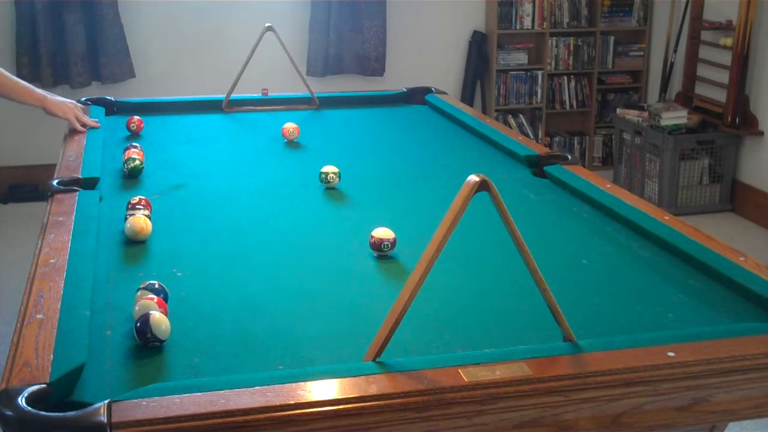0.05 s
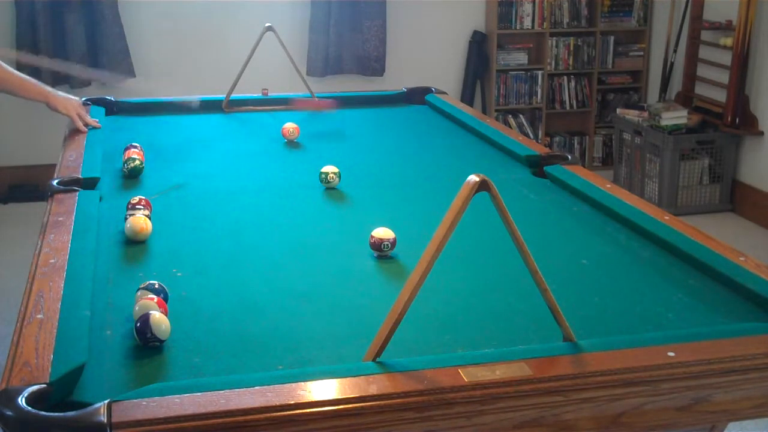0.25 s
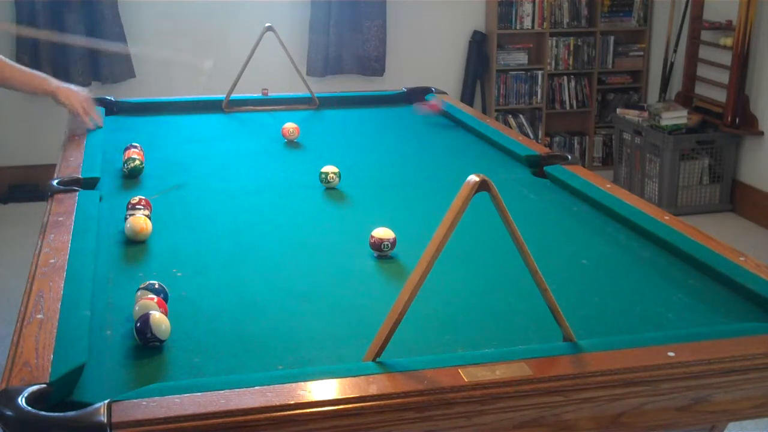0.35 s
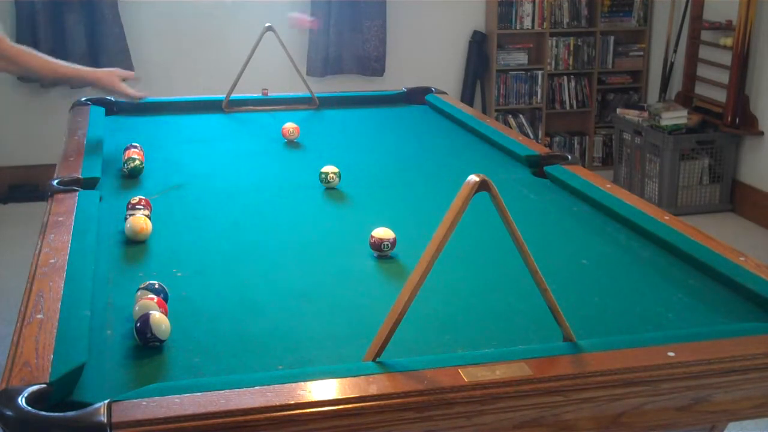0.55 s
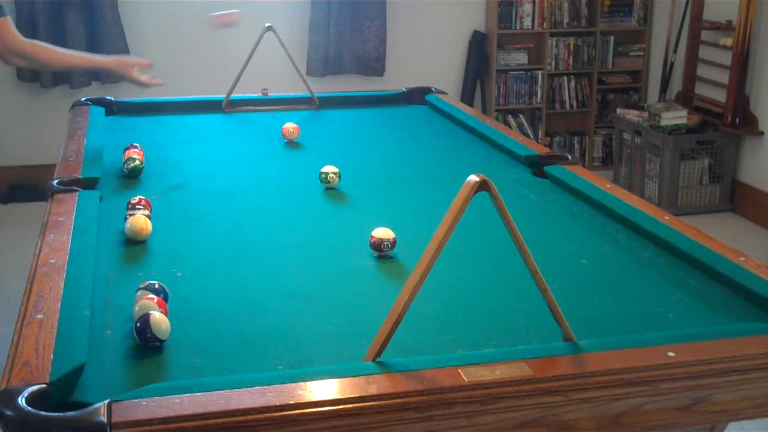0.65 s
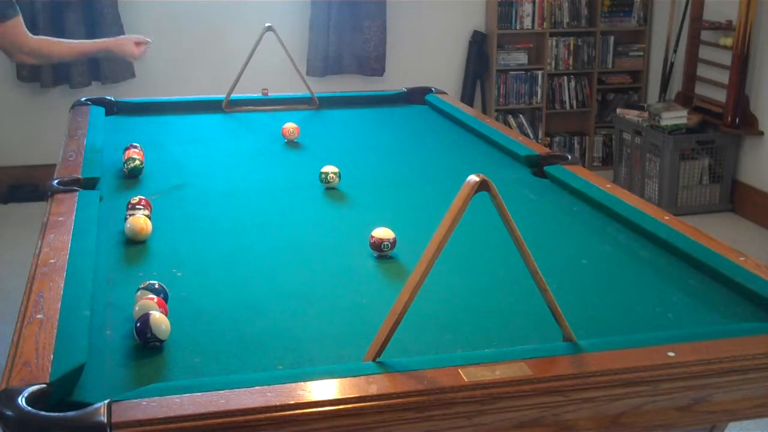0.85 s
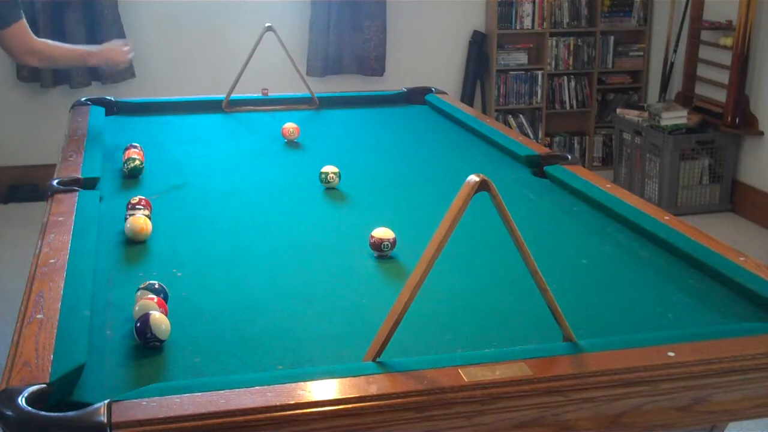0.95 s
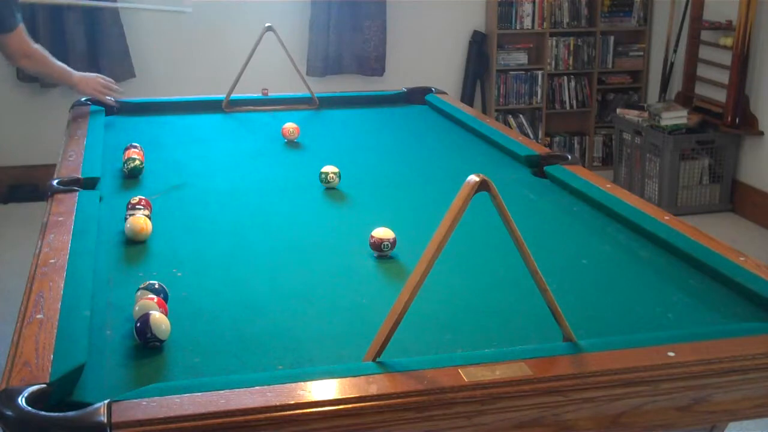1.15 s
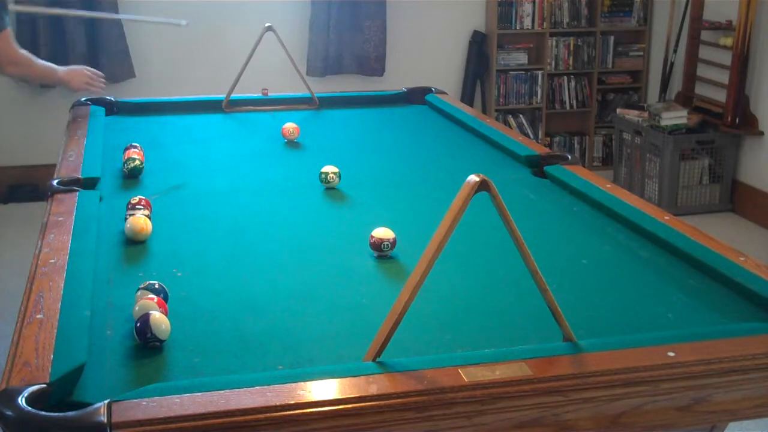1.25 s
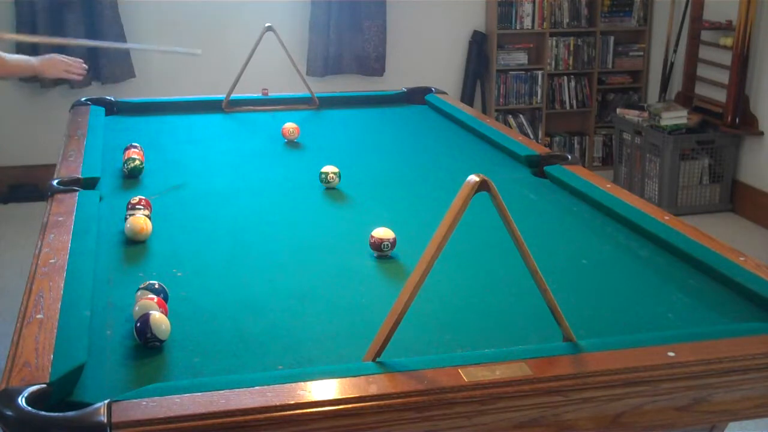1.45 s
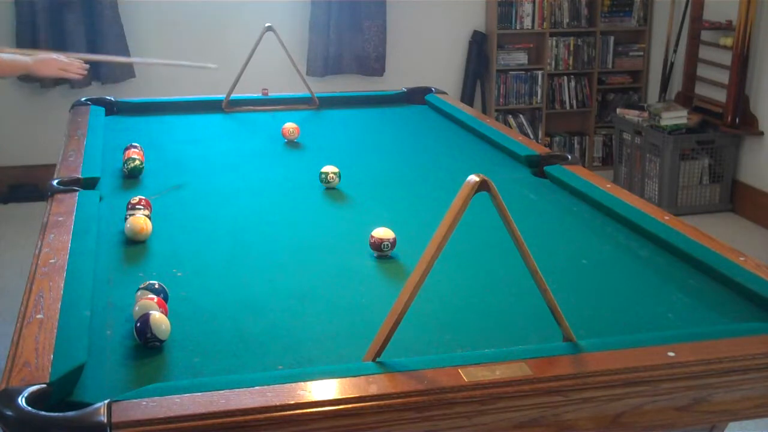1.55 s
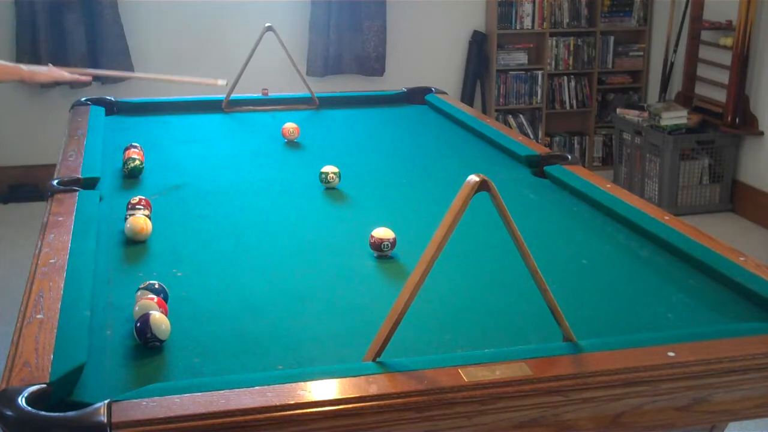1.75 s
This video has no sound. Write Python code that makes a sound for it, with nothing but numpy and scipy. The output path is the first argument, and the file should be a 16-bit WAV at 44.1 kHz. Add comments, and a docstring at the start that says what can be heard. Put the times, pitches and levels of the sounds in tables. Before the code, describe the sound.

A cue cracks a pool ball hard into the table in a small room. The ball thuds off the rail, brushes a curtain, bumps the wall, drops to the floor, clacks against wood and rolls softly.

```python
"""Pool jump shot off the table

In a small room a cue cracks the ball hard into the slate, and the table rings. The ball thuds on the far
rail and flies off, brushes a curtain, bumps the wall, drops to the floor and clatters against wood. Then
it rumbles softly along the floor while something slides. Impacts are coloured pulses with room echo,
struck bodies ring as decaying sines, and friction is swelling, grainy noise."""
import sys
import numpy as np
from scipy import signal
from scipy.fft import rfft, irfft, next_fast_len
from scipy.io import wavfile
from scipy.ndimage import uniform_filter1d

SR = 44100
rng = np.random.default_rng(int(sys.argv[2]) if len(sys.argv) > 2 else 0)


def generate_wav(sig):
    """Save sig (samples, or channels by samples) to the path in sys.argv[1] as 16-bit PCM at SR."""
    pcm = np.round(np.clip(np.atleast_2d(sig).T, -1, 1) * 32767).astype(np.int16)
    wavfile.write(sys.argv[1], SR, pcm)


N = 79380
TIME = np.arange(N) / SR
FFT_SIZE = next_fast_len(2 * N, True)
HZ = np.maximum(np.fft.rfftfreq(FFT_SIZE, 1 / SR), 1)
LEFT_RIGHT = np.array([[1], [-1]])

# the ball driven into the slate (time [s], level [dB])
SLATE_HITS = [(.2092, 2.4)]


def from_db(db):
    """Decibels to gain."""
    return 10 ** (np.asarray(db) / 20)


def at_hz(points, hz):
    """Read a curve on a log-frequency axis."""
    freqs, values = np.transpose(points)
    return np.interp(np.log(hz), np.log(freqs), values)


def decay(t60, t=TIME):
    """Fade by 60 dB in t60 seconds."""
    return np.exp(-np.log(1000) * t / t60)


def filtered(x, gain):
    """Apply a frequency response."""
    return irfft(rfft(x, FFT_SIZE) * gain, FFT_SIZE)[..., :N]


def coloured(x, colour):
    """Minimum-phase EQ along a dB curve, so nothing rings ahead of an attack."""
    cepstrum = irfft(np.log(from_db(at_hz(colour, HZ))), FFT_SIZE)
    cepstrum[1:FFT_SIZE // 2] *= 2
    cepstrum[FFT_SIZE // 2 + 1:] = 0
    return filtered(x, np.exp(rfft(cepstrum)))


def panned(x, balance):
    """Lean each frequency to the left or right."""
    return filtered(x, from_db(LEFT_RIGHT * at_hz(balance, HZ) / 2))


def even_noise():
    """Two white noises, random in detail but even in strength over time and frequency."""
    cells = signal.stft(rng.standard_normal((2, N)), nperseg=1024)[2]
    power = uniform_filter1d(np.abs(cells) ** 2, size=4, axis=1)
    power = uniform_filter1d(power, size=2, axis=2)
    noise = signal.istft(cells / np.sqrt(power + 1e-18))[1][:, :N]
    return noise / noise.std()


def diffuse_noise():
    """Stereo noise, narrow in the low mids and wide in the treble."""
    # stereo width (frequency [Hz], side minus mid [dB])
    width = [(30, 0.5), (100, -14.5), (250, -18.5), (700, -13), (1500, -7.5), (3000, -3), (6000, 2),
             (12000, 0)]
    mid, side = np.roll(even_noise(), N // 2, axis=1)
    return mid + LEFT_RIGHT * filtered(side, from_db(at_hz(width, HZ)))


def room_tail(build_s=0.0041):
    """Reverb that builds quickly and dies at its own rate in each octave."""
    # reverb time of the room (frequency [Hz], t60 [s])
    room_t60 = [(60, 0.94), (170, 0.59), (400, 0.48), (1200, 0.51), (2500, 0.36), (6000, 0.5),
                (12000, 0.22)]
    spectrum, octaves_hz = rfft(diffuse_noise(), FFT_SIZE), np.geomspace(50, 12800, 9)
    tail = 0
    for hz, selector in zip(octaves_hz, np.eye(len(octaves_hz))):
        band = np.interp(np.log(HZ), np.log(octaves_hz), selector)
        tail += irfft(spectrum * band, FFT_SIZE)[:, :N] * decay(at_hz(room_t60, hz))
    return tail * (1 - np.exp(-TIME / build_s))


def pulse_spectrum(hits):
    """One pulse per hit; a soft contact is dull above its cutoff."""
    spectrum = 0
    for s, db, *cutoff in hits:
        lowpass = 1 / (1 + np.sqrt(2) * 1j * HZ / cutoff[0] - (HZ / cutoff[0]) ** 2) if cutoff else 1
        spectrum += from_db(db) * lowpass * np.exp(-2j * np.pi * HZ * round(s * SR) / SR)
    return spectrum


def impacts(hits, colour, direct_db, body_db, body_t60, room_db, build_s, pan_db=0):
    """Each hit is a pulse with early echoes, a short, dense body ring and the room's tail."""
    # reflections off nearby surfaces (delay [s], signed gain)
    echoes = [(.0037, -1), (0.012, 0.55), (0.0134, -0.6), (.022, 0.2)]
    response = from_db(body_db) * diffuse_noise() * decay(body_t60) + from_db(room_db) * room_tail()
    response *= 1 - np.exp(-TIME / build_s)
    for delay, gain in [(0.0006, 1)] + echoes:
        response[:, int(delay * SR)] += gain * from_db(direct_db)
    struck = filtered(response, pulse_spectrum(hits))
    return coloured(struck, colour) * from_db(LEFT_RIGHT * pan_db / 2)


def rings(hits, modes, attack_s=0, spread_db=2):
    """Each hit rings every mode at a varying strength; a yielding contact makes the ring swell first."""
    out = np.zeros(N)
    for s, db, *cutoff in hits:
        t = np.maximum(TIME - s, 0)
        swell = np.minimum(t / attack_s, 1) ** 2 if attack_s else 1
        for hz, mode_db, t60 in modes:
            gain = rng.choice([-1, 1]) * from_db(db + mode_db + spread_db * rng.normal())
            if cutoff:
                gain /= np.hypot(1, (hz / cutoff[0]) ** 2)
            out += gain * np.sin(2 * np.pi * hz * t) * swell * decay(t60, np.maximum(t - attack_s, 0))
    return out


def friction(strokes, colour, room_db, grain_db=2):
    """Grainy rubbing noise that swells and fades, with the room behind it."""
    envelope = 0
    for s, attack, t60, db in strokes:
        swell = np.clip((TIME - s) / attack, 0, 1) ** 2
        envelope += from_db(db) * swell * decay(t60, np.maximum(TIME - s - attack, 0))
    grain_times = TIME[::64]
    grain = from_db(grain_db * np.interp(TIME, grain_times, rng.standard_normal(len(grain_times))))
    rub, tail = diffuse_noise() * envelope * grain, room_tail()
    reverb = filtered(tail / np.sqrt(np.sum(tail[0] ** 2)), rfft(rub.mean(axis=0), FFT_SIZE))
    return coloured(rub + from_db(room_db) * reverb, colour)


def room_hiss():
    """Quiet, steady room tone."""
    # hiss EQ (frequency [Hz], level [dB])
    colour = [(20, -49), (60, -54.5), (150, -55), (300, -51), (700, -56.5), (2000, -59.5), (5000, -61.5),
              (7500, -64), (10000, -67.5), (14000, -68)]
    # hiss panning (frequency [Hz], left minus right [dB])
    balance = [(40, 5.5), (1200, 9), (4000, 3), (8000, -3.5), (12000, -9.5)]
    return panned(coloured(diffuse_noise(), colour), balance)


def late_slide():
    """Something slides softly at the end."""
    # sliding strokes (start [s], attack [s], t60 [s], level [dB])
    strokes = [(1.62, 0.062, 0.29, -7.5), (1.67, 0.07, 0.36, -0.5)]
    # slide EQ (frequency [Hz], level [dB])
    colour = [(100, -48), (500, -38), (1200, -37.5), (2100, -35.5), (3500, -42.5), (7000, -45.5),
              (9500, -62.5), (14000, -76)]
    return friction(strokes, colour, room_db=-4)


def low_thumps():
    """Deep thumps that bloom in the room."""
    # thumps (time [s], level [dB])
    hits = [(.452, 2.6), (1.21, -1.8)]
    # bass-heavy EQ (frequency [Hz], level [dB])
    colour = [(30, -35), (65, -31.5), (95, -22), (140, -18), (220, -32.5), (500, -37), (3000, -108.5)]
    return impacts(hits, colour, direct_db=11.5, body_db=10, body_t60=0.23, room_db=1, build_s=0.011,
                   pan_db=0.5)


def light_ticks():
    """Small, bright contacts with hardly any ring."""
    # ticks (time [s], level [dB], cutoff [Hz])
    hits = [(.452, -0.5, 15000), (1.2078, 3.5, 8150), (1.218, -5.5, 3930), (1.4235, 0, 12220),
            (1.428, 4.5, 12000), (1.438, 2.5, 11700)]
    # tick EQ (frequency [Hz], level [dB])
    colour = [(100, -70.5), (600, -34.5), (2200, -32.5), (4000, -39.5), (7300, -37.5), (9500, -64),
              (14000, -65.5)]
    return impacts(hits, colour, direct_db=19.5, body_db=2, body_t60=0.033, room_db=-6, build_s=0.00041)


def curtain_brush():
    """The flying ball swishes along the curtain."""
    # brushes (start [s], attack [s], t60 [s], level [dB])
    strokes = [(.832, 0.021, 0.032, -1), (.85, 0.017, 0.12, -5)]
    # fabric EQ (frequency [Hz], level [dB])
    colour = [(100, -43.5), (600, -34), (1200, -41), (2400, -37.5), (3300, -25), (4000, -38), (4700, -26),
              (7300, -32.5), (9500, -47.5), (14000, -57)]
    return friction(strokes, colour, room_db=-8)


def wall_bump():
    """The ball meets the wall with one dull knock."""
    # contact (time [s], level [dB])
    hits = [(.912, 0.0073)]
    # wall EQ (frequency [Hz], level [dB])
    colour = [(80, -55), (180, -37), (300, -25.5), (550, -34), (1400, -40.5), (3000, -52.5), (10000, -71.5)]
    return impacts(hits, colour, direct_db=16.5, body_db=6, body_t60=0.16, room_db=-2, build_s=0.0033,
                   pan_db=-0.5)


def floor_roll():
    """The ball bumps along the floor, which answers with a low, damped ring."""
    # bumps (time [s], level [dB])
    hits = [(1.122, -6.5), (1.146, -8.5), (1.586, -8.5), (1.614, -1), (1.649, 0.5)]
    # rumble EQ (frequency [Hz], level [dB])
    colour = [(80, -60), (170, -43.5), (240, -35), (300, -29), (360, -37), (460, -35.5), (700, -49),
              (3000, -65.5)]
    # floor resonances (frequency [Hz], level [dB], t60 [s])
    modes = [(264.5, -1, 0.055), (428, -9, 0.032)]
    bumps = impacts(hits, colour, direct_db=18, body_db=4, body_t60=0.12, room_db=-3, build_s=0.0022,
                    pan_db=-2)
    return bumps + from_db(-44) * rings(hits, modes, attack_s=0.012)


def wood_clatter():
    """The ball strikes something wooden: one sharp clack, then softer, duller ones."""
    # clacks (time [s], level [dB], cutoff [Hz])
    hits = [(1.2518, 3, 16440), (1.3457, -6, 4240), (1.3705, -11, 3600), (1.3936, -9, 3330),
            (1.4604, -15.5, 2700)]
    # clack EQ (frequency [Hz], level [dB])
    colour = [(50, -35), (300, -32), (550, -31.5), (760, -21), (1100, -19), (2000, -7.5), (3600, -15),
              (4800, -27.5), (6000, -29.5), (7300, -33), (9000, -53), (14000, -53)]
    # wood resonances (frequency [Hz], level [dB], t60 [s])
    modes = [(1430, 9, 0.096), (1950, -10, 0.36), (1920, -10.5, 0.076), (2230, -2, 0.26), (2930, 6, 0.083),
             (3050, 6, 0.21), (3634, 10.5, 0.06), (4410, 18.5, 0.0061)]
    clacks = impacts(hits, colour, direct_db=17.5, body_db=-4, body_t60=0.068, room_db=-3.5,
                     build_s=0.0005)
    return clacks + from_db(-38.5) * rings(hits, modes, attack_s=0.00072)


def rail_and_table():
    """The ball thuds and jostles on the rail; slate and rail hits ring the table, and it shudders."""
    # rail contacts (time [s], level [dB])
    rail_hits = [(.3995, -7.5), (.4045, -1.5), (.433, -10), (.456, -12)]
    # rail EQ (frequency [Hz], level [dB])
    colour = [(40, -41), (100, -22), (170, -4), (500, -2), (1050, -5), (1600, -10), (2500, -21),
              (3500, -34), (7000, -45), (14000, -73)]
    # table resonances (frequency [Hz], level [dB], t60 [s])
    table_modes = [(196, -10, 0.42), (296.7, -7, 0.42), (347, -5, 0.32), (549, -10.5, 0.49),
                   (621.5, -4, 0.25), (612, -4.5, 0.076), (770, -1.5, 0.2), (852.5, -4.5, 0.32),
                   (984, -7, 0.26), (1033, -2.5, 0.22), (1138, -7, 0.22), (1182, -12, 0.29),
                   (1314, -2.5, 0.098)]
    # jolts of the frame (time [s], level [dB])
    jolts = [(.516, -29.5), (.556, -33)]
    # frame resonance (frequency [Hz], level [dB], t60 [s])
    frame_modes = [(200, 0, 0.07)]
    thud = impacts(rail_hits, colour, direct_db=14, body_db=2, body_t60=0.27, room_db=-6, build_s=0.004,
                   pan_db=-0.5)
    slate_ring = from_db(-20) * rings(SLATE_HITS, table_modes)
    rail_ring = from_db(-19) * rings(rail_hits[1:2], table_modes)  # the hardest contact only
    shudder = rings(jolts, frame_modes, attack_s=0.012)
    return thud + slate_ring + rail_ring + shudder


def slate_slam():
    """The ball slams into the slate and gives the shot its weight."""
    # slate EQ (frequency [Hz], level [dB])
    colour = [(40, -31), (70, -34.5), (110, -34.5), (145, -7.5), (350, -3.5), (600, -1), (880, -2.5),
              (1400, -3.5), (2500, -13), (5000, -27), (14000, -60)]
    return impacts(SLATE_HITS, colour, direct_db=10.5, body_db=4, body_t60=0.16, room_db=-1.5,
                   build_s=0.0024)


def cue_slide():
    """The cue slides forward with a thin hiss."""
    # cue stroke (start [s], attack [s], t60 [s], level [dB])
    strokes = [(.176, 0.0052, 0.17, -7.5)]
    # airy EQ (frequency [Hz], level [dB])
    colour = [(100, -48), (400, -57.5), (1200, -53), (2500, -54.5), (6000, -39.5), (8000, -32.5),
              (12000, -39.5), (15000, -53.5)]
    return friction(strokes, colour, room_db=4.5)


def cue_strike():
    """The tip cracks on the ball; cue and ball ring brightly over a short knock."""
    # tip contact (time [s], level [dB])
    tip_hits = [(.2085, 0.0058)]
    # crack EQ (frequency [Hz], level [dB])
    colour = [(300, -42), (1500, -17), (3200, -20.5), (4300, -20.5), (5500, -18), (6500, -23), (8000, -22),
              (9300, -38.5), (13500, -40.5), (16000, -58)]
    # cue and ball resonances (frequency [Hz], level [dB], t60 [s])
    crack_modes = [(1597, -8, 0.14), (1720, -16, 0.83), (2522, 1.5, 0.073), (3260, 2.5, 0.062),
                   (4000, -6, 0.26), (5590, -5, 0.24), (7346, -14, 0.19)]
    # crack panning (frequency [Hz], left minus right [dB])
    balance = [(2400, 3.5), (4400, -3), (8000, 0.5), (12000, 5.5)]
    # knocks: the cue meeting the ball, then the ball's rebound (time [s], level [dB])
    knock_hits = [(.2054, -1.5), (.2158, -8)]
    # damped knock resonance (frequency [Hz], level [dB], t60 [s])
    knock_modes = [(794, -1, 0.017)]
    crack = impacts(tip_hits, colour, direct_db=25.5, body_db=18.5, body_t60=0.04, room_db=-0.5,
                    build_s=0.00026, pan_db=2)
    ring = from_db(-22) * rings(tip_hits, crack_modes)
    knock = rings(knock_hits, knock_modes, attack_s=0.0029)
    return panned(crack + ring, balance) + knock


def gain_control(x, threshold_db=-16.5, slope=0.2, recovery_db_per_s=1, makeup_db=2.5):
    """Gentle compression: loud sound ducks the gain, which recovers slowly."""
    power = uniform_filter1d(np.mean(x ** 2, axis=0), size=441)
    over_db = np.maximum(10 * np.log10(power.clip(1e-12)) - threshold_db, 0)
    recovery_db = recovery_db_per_s * TIME
    cut_db = np.maximum.accumulate(slope * over_db + recovery_db) - recovery_db
    return x * from_db(makeup_db - cut_db)


def scene():
    """The shot, the stray ball and the small sounds over the room tone."""
    shot = cue_slide() + cue_strike() + slate_slam() + rail_and_table()
    stray_ball = curtain_brush() + wall_bump() + wood_clatter() + floor_roll()
    return shot + stray_ball + light_ticks() + low_thumps() + late_slide() + room_hiss()


def record(dry):
    """Two unequal microphones feed the compressor; the crack clips and the top end is cut."""
    # microphone imbalance (frequency [Hz], left minus right [dB])
    balance = [(40, -5.5), (200, -0.2), (2600, -0.5), (4600, -1.5), (6200, -4.5), (7600, 12.5),
               (14000, 7.5)]
    ceiling, cutoff_hz = 0.93, 15000
    clipped = np.clip(gain_control(panned(dry, balance)), -ceiling, ceiling)
    return signal.sosfilt(signal.cheby2(16, 70, cutoff_hz, fs=SR, output="sos"), clipped)


dry = scene()
out = record(dry)
generate_wav(out)
```